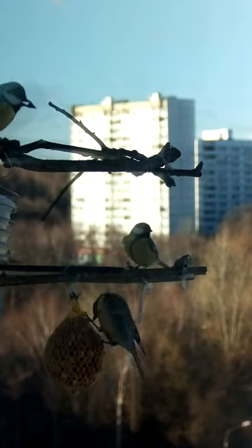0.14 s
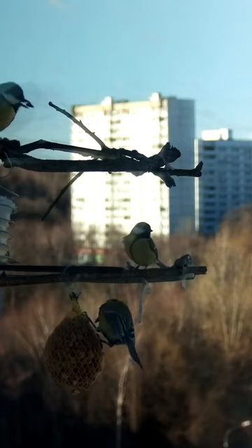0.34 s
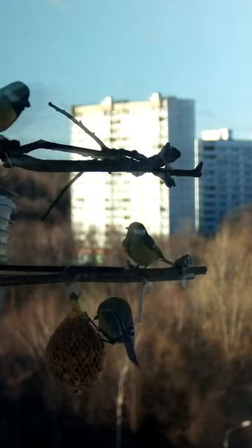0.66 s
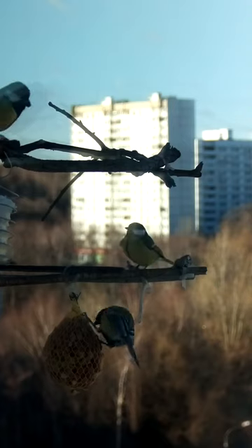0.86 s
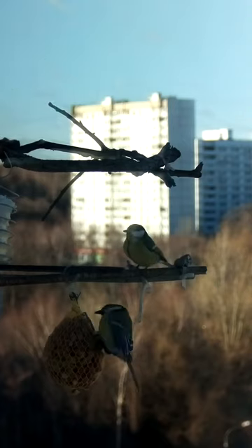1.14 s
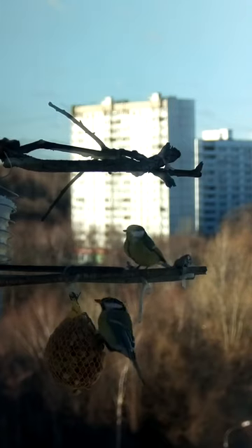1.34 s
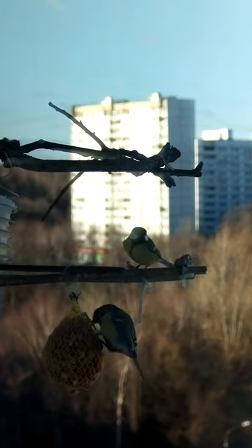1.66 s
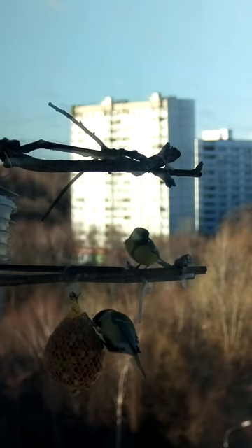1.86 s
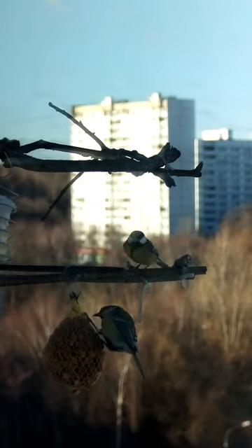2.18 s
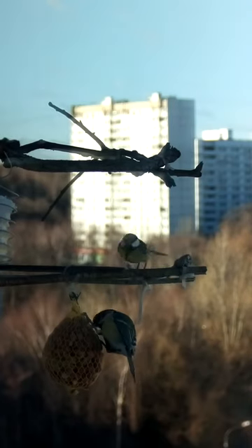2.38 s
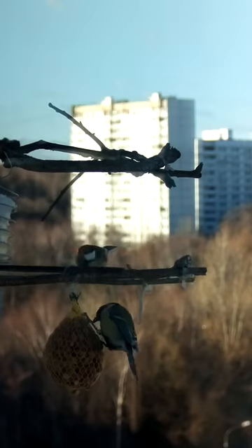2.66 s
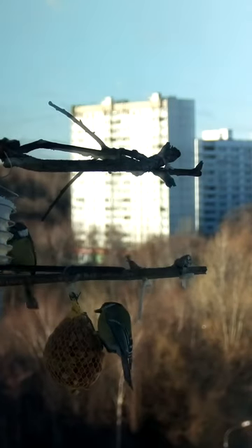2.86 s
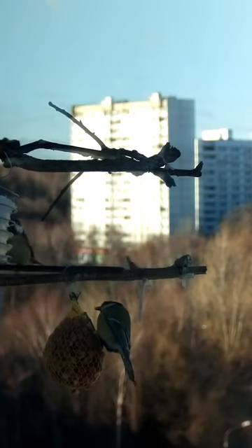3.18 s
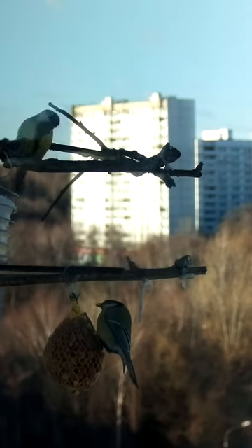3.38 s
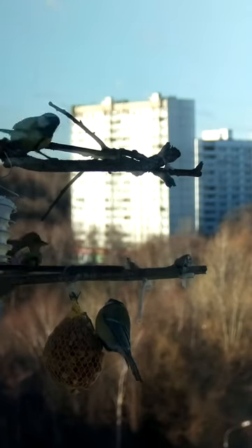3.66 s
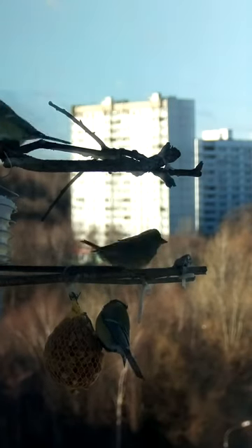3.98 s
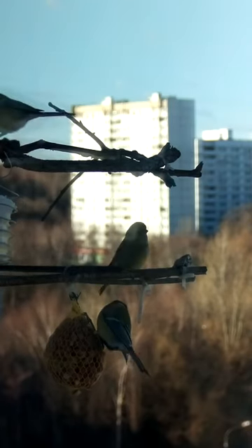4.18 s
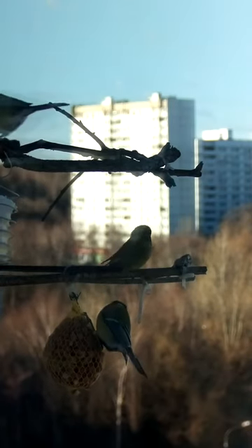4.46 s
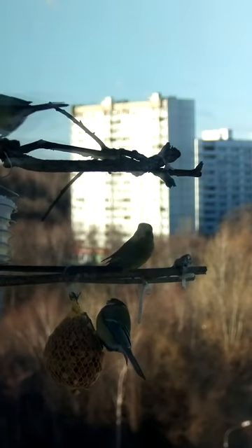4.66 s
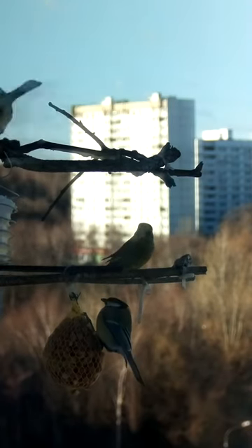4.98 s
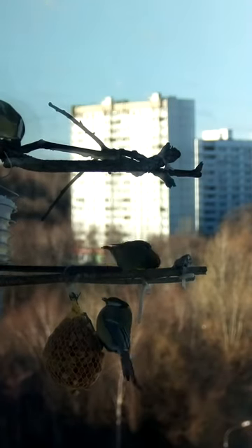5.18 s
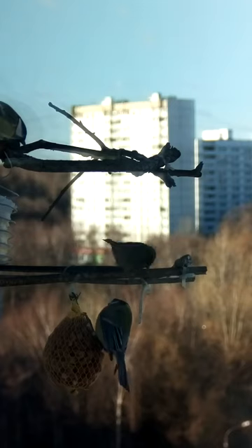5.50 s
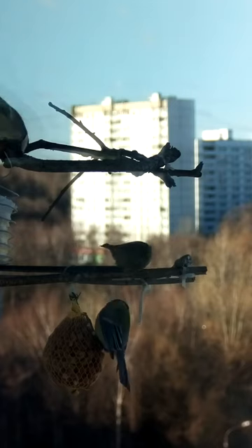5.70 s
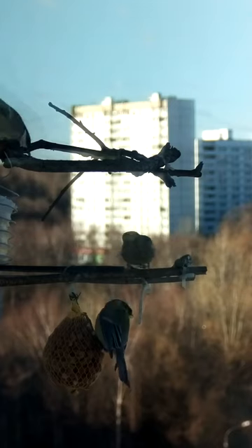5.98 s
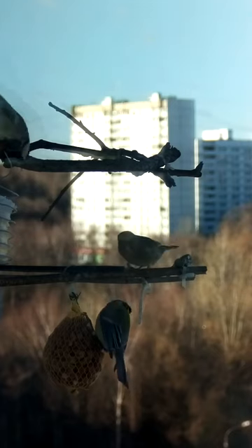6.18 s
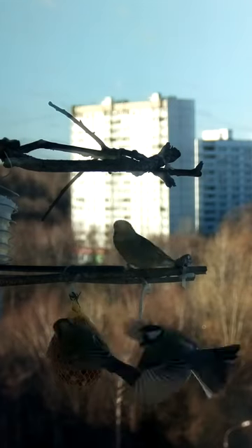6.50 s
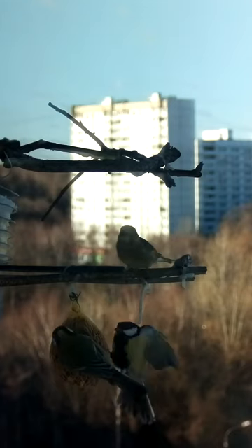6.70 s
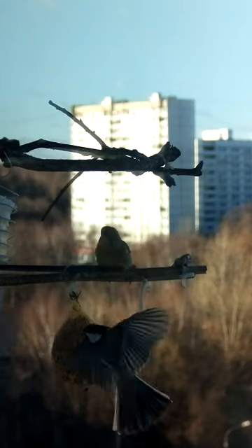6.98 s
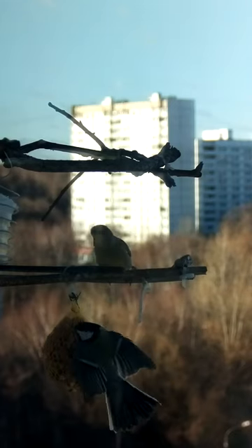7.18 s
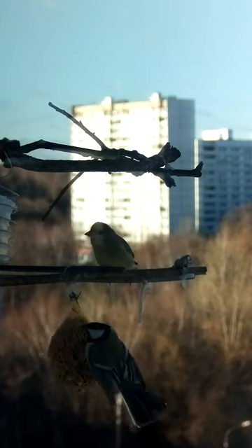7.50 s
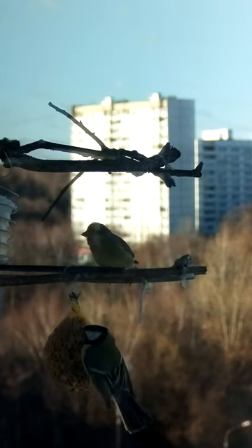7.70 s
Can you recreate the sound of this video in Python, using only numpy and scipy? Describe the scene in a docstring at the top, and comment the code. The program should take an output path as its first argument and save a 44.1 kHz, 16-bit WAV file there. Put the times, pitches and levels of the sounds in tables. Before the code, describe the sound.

Light, uneven beak clicks and claw scratches on husk and wood, soft feather rustles and short piercing tit calls, with very quiet distant traffic behind.

```python
"""At a seed feeder on twigs beside a window, small birds peck, hop and flutter and give short thin calls.
Whistles are gliding near-sines, scolds are harmonic stacks filtered by the beak, and contacts are noise
bursts that ring husk and perch; wings are shaped noise, scrapes and a few taps ring narrowly.
Short reflections follow the birds. A faint city wash lies underneath.
The scene is on the left; the right holds only converter hiss."""
import sys
import numpy as np
from scipy import signal
from scipy.fft import rfft, irfft
from scipy.io import wavfile
from scipy.ndimage import uniform_filter1d

SR = 44100
rng = np.random.default_rng(int(sys.argv[2]) if len(sys.argv) > 2 else 0)


def generate_wav(signal):
    """Clip the signal to [-1, 1] and save it as 16-bit WAV at the path in sys.argv[1]."""
    frames = np.transpose(np.atleast_2d(signal))
    scaled = np.clip(frames, -1, 1) * 32767
    pcm = np.round(scaled).astype(np.int16)
    wavfile.write(sys.argv[1], SR, pcm)


N = 345744  # samples

# All source levels stand ahead of the preamplifier gain and the filters.
# Spectrum of the city wash. Each row: frequency in Hz, density in dB per Hz.
CITY_SPECTRUM = [(59, -82), (100, -33), (198, -30.5), (409, -24.5), (844, -3.5), (1000, -0.5), (1470, -2),
                 (1780, -5), (2110, -24), (2450, -7.5), (3030, -5), (6270, -4), (9200, -8.5), (15000, -8),
                 (16400, -26)]
CITY_DB = -67  # rms
# Spectrum of feather noise. Each row: frequency in Hz, density in dB per Hz.
FEATHER_SPECTRUM = [(400, -41), (700, -21.5), (1000, -13), (1500, -9), (2100, -17.5), (3000, 0.5),
                    (4000, 1.5), (6000, 0.5), (8200, -1.5), (9500, -8), (12000, -13.5), (15300, -16),
                    (16200, -26.5)]
# Level curves of restless rustling, one list a passage. Each row: time in seconds, level in dB.
FLUTTER_CURVES = [
    [(0.95, -69), (1.11, -78.5), (1.258, -61), (1.358, -58.5), (1.428, -56.5), (1.616, -68.5), (1.65, -87)],
    [(3.5, -88), (3.688, -74.5), (3.884, -60), (3.984, -66), (4.25, -76)],
    [(5.5, -74), (5.642, -66), (5.748, -95), (5.936, -82), (6.054, -84), (6.15, -96)],
    [(6.3, -77), (6.384, -67), (6.534, -74), (6.998, -61.5), (7.216, -79), (7.368, -56), (7.84, -62.5)],
]
# Single wing strokes and feather shuffles. Each row: centre in seconds, level in dB, length in seconds,
# brightness in dB per octave.
WING_STROKES = [(0.018, -49.5, .022, 0.5), (0.412, -54, 0.011, -5), (0.516, -65, 0.036, 2),
                (0.915, -57, .017, -4), (1.033, -50, 0.017, 2), (1.142, -59, 0.025, 2),
                (1.341, -51.5, 0.025, 1.5), (1.462, -50, .018, 3.5), (1.549, -52.5, 0.02, 0),
                (1.928, -59, 0.0063, 7), (2, -67, 0.014, -1), (2.451, -61, 0.027, 8),
                (3.131, -62, 0.032, -3.5), (3.19, -64.5, 0.028, -1.5), (3.565, -57, 0.015, 5.5),
                (3.699, -53, 0.011, -6), (3.731, -54, 0.012, 6.5), (3.976, -54, .059, 1),
                (4.035, -54.5, 0.022, 0.5), (4.076, -57.5, 0.066, 1.5), (4.183, -59, 0.036, -3),
                (4.291, -60, 0.034, -4.5), (5.034, -64, 0.03, -1), (5.672, -58.5, 0.023, -2.5),
                (5.806, -61, .037, -1.5), (5.884, -55.5, .029, -1), (6.081, -61, 0.029, 3),
                (7.076, -64.5, 0.031, 12), (7.156, -57, 0.04, 5.5), (7.282, -50.5, 0.034, 3),
                (7.525, -54.5, 0.022, -9), (7.554, -59.5, 0.066, 8), (7.809, -52, .026, -6)]
# Short narrow ringing sounds: claw scrapes over mesh or bark and a few ringing taps. Each row: centre in
# seconds, level in dB, length in seconds, resonance in Hz.
NARROW_RINGS = [(0.004, -43, 0.009, 4410), (.877, -60.5, 0.012, 3660), (1.136, -50.5, 0.005, 6250),
                (1.804, -56.5, 0.0074, 4600), (3.351, -56, .015, 4560), (4.82, -71, 0.015, 4130),
                (5.786, -51.5, 0.015, 3940), (6.025, -57.5, 0.011, 995), (6.034, -53.5, 0.026, 4060),
                (6.091, -54, .017, 4000), (6.097, -61.5, 0.025, 990), (6.381, -56, .011, 2760),
                (6.482, -50.5, 0.0074, 2820), (6.617, -59, 0.0078, 2790), (7.802, -62.5, 0.032, 1530)]
# Beak and claw contacts. Each row: time near the contact's peak in seconds, level in dB, thud setting of the
# perch in dB, brightness in dB per octave, time to decay by 60 dB in seconds.
CONTACTS = [(0.0367, -46.5, -20, -4, 0.026), (0.2843, -44.5, 0, -8.5, 0.074),
            (0.3622, -45.5, -17.5, -8, 0.016), (0.4127, -54, -14, 10, 0.042),
            (0.7946, -29.5, -51, -3.5, 0.015), (1.066, -39.5, -13, 1.5, 0.035), (1.166, -50, -32, 0, 0.091),
            (1.196, -52, -15, -5, 0.035), (1.2352, -36.5, -30, -1.5, .01), (1.377, -43.5, -15, -8, 0.062),
            (1.3874, -30.5, -29, 2, 0.012), (1.4895, -43, -16.5, -5, 0.047),
            (1.5305, -47.5, -16, -6, 0.017), (1.546, -40.5, -35, -7, 0.016), (1.56, -44.5, -12, -5, 0.069),
            (1.702, -36.5, -31, 8, 0.0048), (1.73, -43, -31, 4, .007), (1.7773, -28.5, -47, 8, 0.0085),
            (1.851, -41, -18.5, -9, 0.021), (2.1226, -49.5, -16, -10, 0.032),
            (2.1843, -43.5, -38, 6, 0.0089), (2.208, -46.5, -25.5, -3, 0.038), (2.2183, -48, -26, -4, 0.02),
            (2.454, -43.5, -34, -16, 0.0065), (2.487, -50, -23.5, 14.5, .031),
            (2.5196, -38.5, -30.5, 13, 0.0044), (2.5931, -28.5, -46, -0.5, 0.0083),
            (2.6023, -43.5, -38, -11, 0.015), (2.6934, -51.5, -22, 4, 0.023),
            (2.7206, -34.5, -35, 7.5, 0.0059), (2.753, -51, -32, 4, 0.012), (2.8963, -44.5, -18, -2, 0.033),
            (2.9378, -42, -40, 2, 0.018), (3.2291, -45, -21, 4, 0.014), (3.237, -47, -15.5, -5, 0.048),
            (3.415, -47, -31, -9, .028), (3.466, -48, -19, -7, 0.018), (3.6136, -47.5, -21, -5, 0.022),
            (3.6524, -44.5, -20, -10.5, 0.023), (3.7436, -48, -22, 10, 0.0086),
            (3.8142, -39.5, -42, -4, 0.015), (3.8466, -42.5, -35, -7, 0.017), (3.9, -48.5, -30, 9, 0.029),
            (4.435, -48, -27, -6, 0.011), (4.54, -32.5, -36, -11, 0.012), (4.6858, -42, -8.5, -4.5, .023),
            (4.768, -57, -18.5, -3, 0.018), (4.7888, -38, -6, -4, 0.019), (4.939, -64, -21, -4, 0.013),
            (4.948, -25, -15, -10, 0.018), (5.078, -48, -19, 4, 0.019), (5.0848, -37.5, -25, -8, 0.036),
            (5.1249, -27.5, -11.5, -5.5, .014), (5.132, -32, -19.5, -2, 0.011),
            (5.2962, -29, -12, -10.5, .016), (5.3282, -43.5, -24, -3, 0.029), (5.4165, -51, -14, -8, .039),
            (5.453, -45.5, -18, -2, .018), (5.6056, -49.5, -14, -9, 0.028), (5.7767, -48, -11.5, -4, 0.012),
            (5.9264, -50.5, -30, -4.5, .066), (6.017, -38.5, -23, -14, 0.028),
            (6.028, -47.5, -14, -21, 0.022), (6.0936, -43.5, -17, -3, 0.012),
            (6.2492, -58, -32, -11, 0.038), (6.3481, -34.5, -35, 5, 0.011), (6.419, -40.5, -28, -4, 0.041),
            (6.4403, -52, -18, -4, .025), (6.4776, -50, -11.5, -10, 0.017),
            (6.5035, -40, -22.5, -9.5, 0.019), (6.575, -39, -40, -5, 0.012),
            (6.5983, -45, -18, -12.5, 0.026), (6.6548, -51.5, -31, -1, .042), (6.7815, -40.5, -11, 2, 0.13),
            (6.863, -52.5, -31, -2, .051), (6.8837, -54, -7.5, 1, .038), (6.9794, -45.5, -42, -4, .022),
            (7.2635, -35, -35, -7, 0.018), (7.3912, -45.5, -28, 12, 0.021),
            (7.4794, -41.5, -18, 3.5, 0.021), (7.4853, -40, -29, -13, 0.013), (7.719, -53, -6, -3, .11),
            (7.7267, -38, -32.5, -3.5, 0.048), (7.738, -44, -33, -2, 0.024), (7.8307, -44, -18, -8, .034)]
# Spectrum of a click. Each row: frequency in Hz, density in dB per Hz.
CLICK_SPECTRUM = [(900, -61), (2100, -38), (2900, -5), (4500, -1), (7000, 1.5), (10000, -4), (14000, -15),
                  (16500, -23)]
# Dense, damped modes of the wooden perch. Each row: frequency in Hz, density in dB per Hz.
PERCH_SPECTRUM = [(300, -28), (600, -29), (880, -3.5), (980, -2.5), (1100, -1), (1450, -2.5), (1750, -3.5),
                  (2100, -22.5), (2900, 0.5), (3600, -14.5), (4400, -1), (5200, -25.5), (7000, -46)]
# Light contacts ring the thin husk, firm ones the wood. Each row: thud setting in dB, typical ring in Hz.
RING_BY_THUD = [(-29, 6580), (-19.5, 4860), (-19, 2500)]
RING_SPREAD = 0.16  # standard deviation of the log frequency
PERCH_T60 = 0.044  # s
# Scolding calls, one list a call. Each row: time in seconds, pitch in Hz, effort in dB, roughness from 0 to 1.
SCOLD_CALLS = [
    [(4.289, 3550, -55, 0.1), (4.295, 6300, -48.5, 0.04), (4.3005, 4250, -34.5, 0.3),
     (4.304, 3654, -46.5, 0.14), (4.317, 3610, -45, 0.42), (4.325, 2200, -45.5, 0.3),
     (4.335, 1430, -53.5, 0.7), (4.349, 1284, -56, .8)],
    [(7.193, 6990, -55, 0.1), (7.197, 5900, -43, 0.15), (7.202, 3770, -43.5, 0), (7.211, 3810, -40, 0.32),
     (7.218, 3430, -43.5, 0.1), (7.225, 2134, -38.5, 0.35), (7.232, 1595, -50.5, 0.15),
     (7.243, 1197, -42, 0.3)],
]
# Resonance of the beak. Each row: frequency in Hz, gain in dB.
BEAK_RESONANCE = [(1500, -47), (2500, -4), (3700, 4.5), (5500, 12), (7400, 14.5), (9000, -12),
                  (11500, -9.5), (15000, -37)]
PANE_S, PANE_DB = .0017, -5  # the glass echoes the scolding bird, so its glides beat
# Whistled calls; the row at 6.9158 is the soft lead-in of the next one. Each row: start in seconds, length
# in seconds, first pitch in Hz, settled pitch in Hz, glide time in seconds, drift in Hz per ms, time of the
# swell's peak after the start in seconds, level in the glide in dB, after it in dB, at the swell in dB,
# octave's starting level in dB, echoes in dB.
WHISTLE_CALLS = [(0, 0.013, 7000, 7050, 0.00097, -4, 0.0074, -16.5, -40, -48, -58, -13),
                 (.142, 0.043, 4160, 6400, 0.0063, -0.5, .04, -33, -40, -41.5, -52.5, -4),
                 (0.43, 0.013, 5100, 5090, 0.0017, -18, 0.011, -29, -37.5, -37.5, -55, -20),
                 (.5835, 0.05, 3820, 6350, 0.0095, -4, 0.055, -33.5, -50, -37.5, -46.5, -9.5),
                 (1.863, 0.02, 4750, 2980, 0.0058, -9.5, .017, -35, -34, -37, -44, -13),
                 (3.292, 0.025, 4730, 3040, 0.0062, -15.5, 0.013, -37.5, -36, -36, -52, -3.5),
                 (3.359, .025, 5010, 3295, 0.0054, -19, 0.023, -26.5, -28.5, -30, -51, -7.5),
                 (3.431, 0.025, 4840, 3360, 0.0054, -18.5, 0.027, -24.5, -27.5, -28.5, -51.5, -9),
                 (3.855, 0.031, 4610, 6690, 0.0089, -3.5, 0.032, -31.5, -30, -30, -58, -4),
                 (5.547, 0.043, 3760, 6410, 0.0085, -4, 0.037, -34, -49, -37, -56.5, -5.5),
                 (5.736, 0.0176, 5130, 5176, 0.0016, -20, 0.0055, -28, -38, -32, -48.5, -21),
                 (6.9158, .0065, 4320, 5630, .003, 0, .006, -34, -39, -38, -85, -10),
                 (6.9202, 0.025, 5540, 6390, 0.004, 24.5, 0.024, -21, -25.5, -11.5, -62, -23),
                 (7.344, 0.034, 5300, 6440, 0.0041, -11, .009, -34.5, -29.5, -30, -75, -9),
                 (7.64, 0.011, 5200, 5080, 0.0017, -15, 0.0044, -35, -31.5, -34, -63, -22)]
# A second, low voice at the start of some rising calls. Each row: centre in seconds, half length in seconds,
# level in dB, pitch at the centre in Hz.
LOW_VOICES = [(0.146, 0.0043, -48.5, 2510), (3.86, 0.0039, -47, 2500), (6.92, 0.0029, -54.5, 2550)]
# Echoes near the glass, at the perch of the falling calls. Each row: delay in seconds, level in dB
# relative to the call's echo setting. They beat with a gliding tone.
GLASS_ECHOES = [(.0013, -1.5)]
# Echoes off frame and feeder at the other perches. Each row: delay in seconds, level in dB
# relative to the call's echo setting.
FRAME_ECHOES = [(.00065, -11), (.0031, -7.5), (.0078, -10)]
TWELFTH_DB = -36.5  # third partial of the whistles against the first, below 4200 Hz only
RISE_BEND, FALL_BEND = 2.07, 0.98  # a rising glide starts lazily, a falling one at once
GLIDE_ENDS, HOLD_STARTS = 1.1, 1.9  # in glide times
SWELL_BEND = 1.5  # the swell grows late
FADE_DB_PER_S = -650  # after the swell
ATTACK_S, RELEASE_S = 0.0037, .004
TAIL_DB, TAIL_T60 = -17, 0.052  # scatter from the pane, frame and feeder; time in s
EDGE_HZ = 16500  # upper band limit


def amp(db):
    """Converts a level in decibels to an amplitude ratio."""
    return 10 ** (np.asarray(db) / 20)


def evened(x):
    """Normalizes a signal to unit rms."""
    return x / np.sqrt(np.mean(x ** 2) + 1e-20)


def add(mix, s, sound):
    """Superposes a sound on the mix from s seconds, as pressures add linearly."""
    part = mix[max(round(s * SR), 0):][:len(sound)]
    part += sound[:len(part)]


def read(points, hz):
    """Interpolates a spectrum on a logarithmic frequency axis."""
    f, db = np.transpose(points)
    return np.interp(np.log(hz + 1), np.log(f), db)


def hiss(length, points, tilt_db=0.):
    """Filters white noise by a spectrum, tilted per octave about 5 kHz; expected rms 1."""
    hz = np.fft.rfftfreq(length, 1 / SR)
    octaves = np.log2(np.clip(hz, 2500, SR) / 5000)  # no further tilt under 2500 Hz
    gain = amp(read(points, hz) + tilt_db * octaves)
    noise = irfft(rfft(rng.standard_normal(length)) * gain, length)
    return noise / np.sqrt(np.mean(gain ** 2))


def wander(smooth_s):
    """Averages white noise twice into a slow random curve of rms 1."""
    span = max(round(smooth_s * SR), 2)
    once = uniform_filter1d(rng.standard_normal(N), span)
    return evened(uniform_filter1d(once, span))


def spread(rows):
    """Interpolates the columns of a curve table linearly in time at the sample rate."""
    s, *columns = np.transpose(rows)
    t = np.arange(s[0], s[-1], 1 / SR)
    return t, [np.interp(t, s, column) for column in columns]


def city():
    """Distant traffic merges into broadband noise whose level wavers slightly."""
    return amp(CITY_DB + 0.67 * wander(0.13)) * hiss(N, CITY_SPECTRUM)


def scatter(x):
    """Many close reflections act as convolution with exponentially decaying noise."""
    t = np.arange(6000) / SR
    tail = rng.standard_normal(len(t)) * amp(-60 * t / TAIL_T60) * (t > .003)
    return amp(TAIL_DB) * signal.oaconvolve(x, tail / np.linalg.norm(tail))[:N]


def scrabble():
    """Faint shuffles of claws and seed form a random pulse train, on average 30 puffs a second."""
    size_db = 2.2 * np.minimum(rng.exponential(1, N), 3)
    pulses = amp(size_db) * (rng.random(N) < 30 / SR)
    puffs = signal.oaconvolve(pulses, np.hanning(500))[:N]
    return amp(-70.0) * puffs * hiss(N, CLICK_SPECTRUM)


def flutter():
    """Restless feathers modulate broadband noise in uneven puffs between the clear strokes."""
    level = np.zeros(N)
    for rows in FLUTTER_CURVES:
        t, (db,) = spread(rows)
        add(level, t[0], amp(db) * signal.windows.tukey(len(t), .05))
    puffs = amp(2.4 * wander(0.0048) + 3.5 * wander(0.0041))
    return level * hiss(N, FEATHER_SPECTRUM) * puffs


def stroke(s, level_db, length, tilt_db):
    """A wing stroke is feather noise with random grain under a smooth swell."""
    count = round(2.1 * length * SR)  # the swell is about one length wide at half height
    grain = amp(3.37 * evened(uniform_filter1d(rng.standard_normal(count), 60)))
    sound = hiss(count, FEATHER_SPECTRUM, tilt_db) * grain * np.hanning(count)
    return s - count / SR / 2, amp(level_db) * sound


def patchy(x, depth_db):
    """Random gains colour the time-frequency plane in patches of about 860 Hz by 10 ms."""
    z = signal.stft(x, nperseg=256, noverlap=192)[2]
    field = rng.standard_normal(z.shape[::-1]).T
    field = uniform_filter1d(field, size=5, axis=0)  # along frequency
    field = evened(uniform_filter1d(field, size=7, axis=1))  # along time
    return signal.istft(z * amp(depth_db * field), nperseg=256, noverlap=192)[1][:N]


def narrow_ring(s, level_db, length, hz):
    """Uneven random impulses, as of a scraping claw, excite one narrow resonance under a short swell."""
    count = round(2 * length * SR)
    impulses = rng.standard_normal(count) * amp(1.8 * rng.standard_normal(count))
    ring = signal.iirpeak(hz, np.sqrt(hz / 30), SR)
    ringing = signal.lfilter(*ring, signal.lfilter(*ring, impulses))
    return s - count / SR / 2, amp(level_db) * evened(ringing) * np.hanning(count)


def tap(s, level_db, thud_db, tilt_db, t60):
    """An impact excites damped resonances: a crack rings the husk, a firm one also knocks the perch."""
    t = np.arange(4096) / SR
    husk_hz = np.interp(thud_db, *np.transpose(RING_BY_THUD)) * np.exp(RING_SPREAD * rng.standard_normal())
    rise_s = .001 + 0.053 * t60  # longer contacts also start more softly
    rise = np.minimum(t / rise_s, 1) ** 2
    snap = 0.34 * amp(-60 * np.maximum(t - rise_s, 0) / 0.0046)
    grainy_tail = 0.94 * amp(-60 * t / t60)
    crack = hiss(len(t), CLICK_SPECTRUM, tilt_db) * rise * (snap + grainy_tail)
    husk = signal.lfilter(*signal.iirpeak(husk_hz, 7.0, SR), crack)
    perch_decay = amp(-60 * t / PERCH_T60) + 0.21 * amp(-25 * t / PERCH_T60)
    knock = hiss(len(t), PERCH_SPECTRUM) * rise * perch_decay
    sound = 1.397 * crack + 1.28 * husk + amp(thud_db + 5.0) * knock
    return s - .7 * rise_s, amp(level_db) * sound


def scold(rows):
    """Source and filter: a harmonic stack, mostly falling, passes the fixed beak resonance, variably hoarse."""
    t, (hz, effort_db, rough) = spread(rows)
    rough = np.clip(rough, 0, 1)
    shake = uniform_filter1d(rng.standard_normal((9, len(t))), size=30)
    shake = evened(uniform_filter1d(shake, size=30))  # row 0 shakes the pitch, the others one partial each
    hz = uniform_filter1d(hz, size=150, mode="nearest")  # the pitch bends smoothly
    phase = 2 * np.pi * np.cumsum(hz * (1 + 0.0091 * rough * shake[0])) / SR
    voice = amp(-19) * hiss(len(t), BEAK_RESONANCE)  # air hisses through the beak
    for k in range(1, 9):
        partial_gain = amp(read(BEAK_RESONANCE, k * hz) - 1.08 * k)
        voice += partial_gain * np.sin(k * phase) * (1 - rough + rough * shake[k])
    call = np.pad(amp(effort_db) * voice * signal.windows.tukey(len(t), .06), (0, 200))
    return t[0], call + amp(PANE_DB) * np.roll(call, round(PANE_S * SR))


def whistle(start, length, first_hz, settled_hz, glide, drift, swell,
            glide_db, hold_db, swell_db, octave_db, echoes_db):
    """A gliding near-sine has weak overtones; in some rising calls the syrinx's second side joins briefly."""
    t = np.arange(0, length, 1 / SR)
    rising = settled_hz > first_hz
    bend = RISE_BEND if rising else FALL_BEND
    hz = settled_hz + (first_hz - settled_hz) * np.exp(-(t / glide) ** bend) + drift * 1000 * t
    phase = 2 * np.pi * np.cumsum(hz) / SR

    ramps = np.minimum(t / ATTACK_S, (length - t) / RELEASE_S)
    shape = np.sin(np.pi / 2 * np.clip(ramps, 0, 1)) ** 2
    hold = HOLD_STARTS * glide
    db = np.interp(t, [GLIDE_ENDS * glide, hold], [glide_db, hold_db])
    swelling = np.clip((t - hold) / max(swell - hold, .001), 0, 1) ** SWELL_BEND
    db += (swell_db - hold_db) * swelling
    level = shape * amp(db + FADE_DB_PER_S * np.maximum(t - swell, 0))

    # airflow roughens the tone
    breath = evened(np.convolve(rng.standard_normal(len(t)), np.hanning(48), "same"))
    tone = level * (1 + 0.021 * breath) * np.sin(phase)
    octave_level = shape ** 3.2 * amp(octave_db - 230 * t)  # fades by 230 dB per second
    tone += octave_level * (1 + .3 * breath) * np.sin(2 * phase)
    tone += amp(TWELFTH_DB) * level * (hz < 4200) * np.sin(3 * phase)

    unsteady = evened(uniform_filter1d(rng.standard_normal(len(t)), size=60))
    for s, half, low_db, low_hz in LOW_VOICES:
        u = t + start - s
        low = 2 * np.pi * low_hz * (u + 10.0 * u ** 2) + .5 * unsteady  # it glides up a little
        low_level = amp(low_db) * np.exp(-(u / half) ** 2)
        tone += low_level * (np.sin(low) + np.sin(phase + low))  # with its sum tone

    call = np.pad(np.sqrt(2) * tone * signal.windows.tukey(len(t), .08), (0, 600))
    sound = call.copy()
    for delay, echo_db in FRAME_ECHOES if rising else GLASS_ECHOES:
        sound += amp(echoes_db + echo_db) * np.roll(call, round(delay * SR))
    return start, sound


def scene():
    """Direct sound and scatter of the birds superpose on the city, on the left only."""
    feathers = flutter() + scrabble()
    for row in WING_STROKES:
        add(feathers, *stroke(*row))
    birds = patchy(feathers, 2.8)
    for row in NARROW_RINGS:
        add(birds, *narrow_ring(*row))
    for row in CONTACTS:
        add(birds, *tap(*row))
    for rows in SCOLD_CALLS:
        add(birds, *scold(rows))
    for row in WHISTLE_CALLS:
        add(birds, *whistle(*row))
    thin = signal.butter(3, 450, "high", fs=SR, output="sos")  # the birds' sounds are thinned below about 450 Hz
    left = signal.sosfilt(thin, birds + scatter(birds)) + city()
    return np.array([left, np.zeros(N)])


def record(dry):
    """A linear chain doubles the amplitude and limits the band; converter noise adds to both channels."""
    edge = signal.firwin(511, EDGE_HZ, window=("kaiser", 9), fs=SR)
    limited = signal.oaconvolve(2 * dry, edge[None], "same")
    return limited + amp(-96) * rng.standard_normal(dry.shape)


dry = scene()
out = record(dry)
generate_wav(out)
```